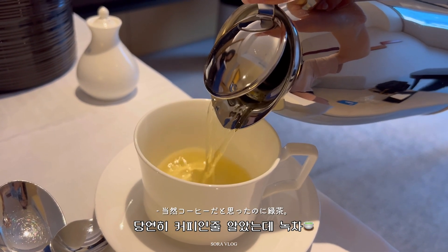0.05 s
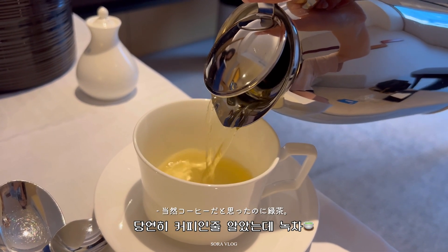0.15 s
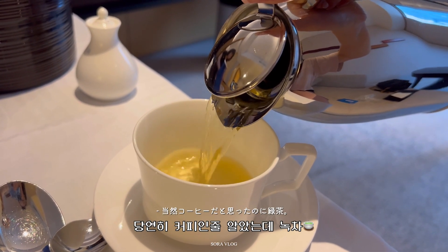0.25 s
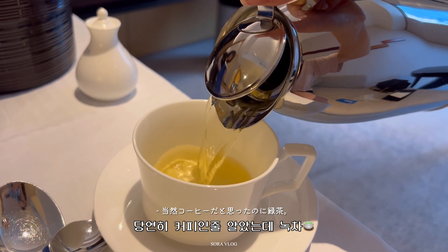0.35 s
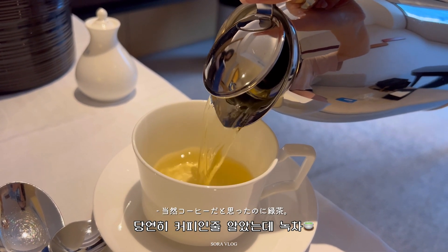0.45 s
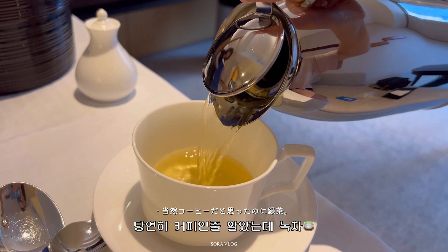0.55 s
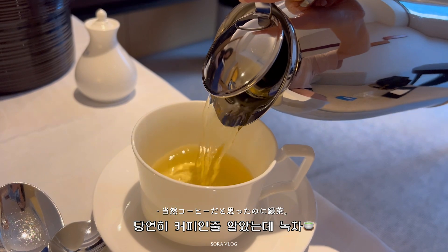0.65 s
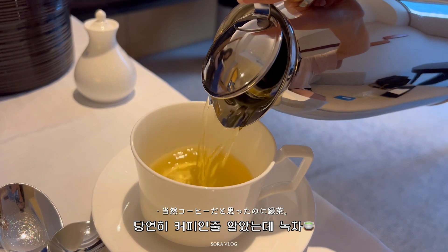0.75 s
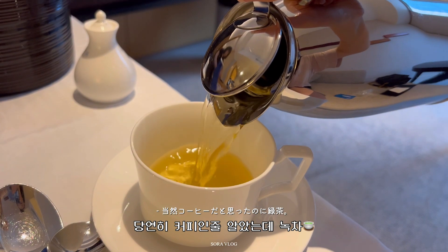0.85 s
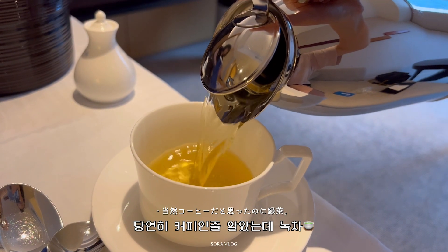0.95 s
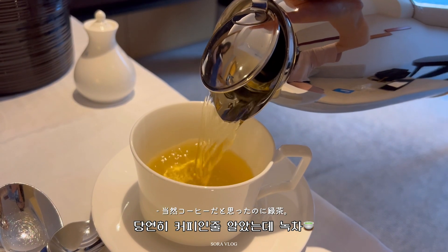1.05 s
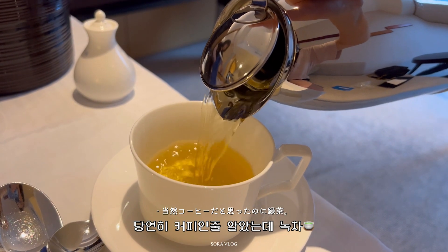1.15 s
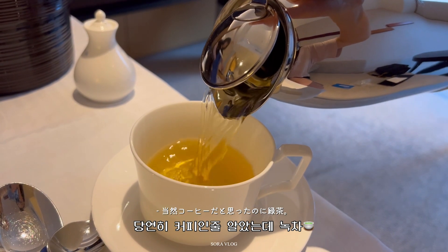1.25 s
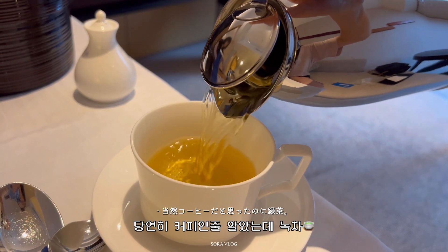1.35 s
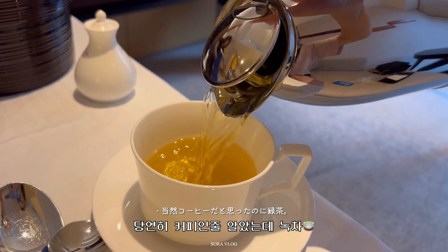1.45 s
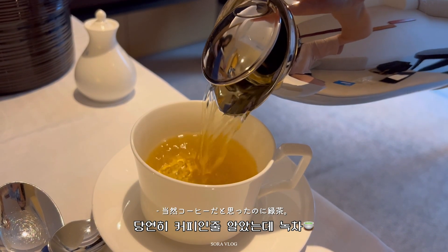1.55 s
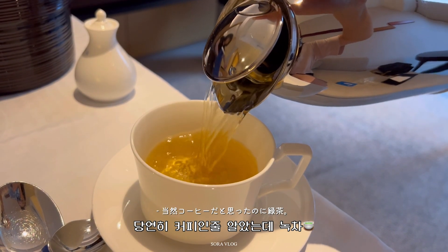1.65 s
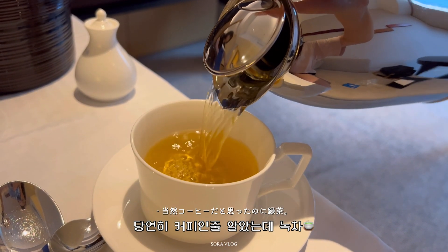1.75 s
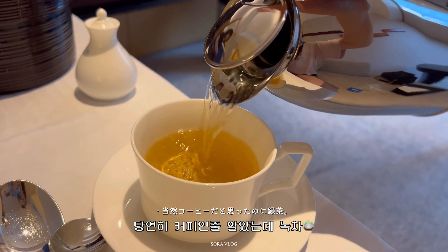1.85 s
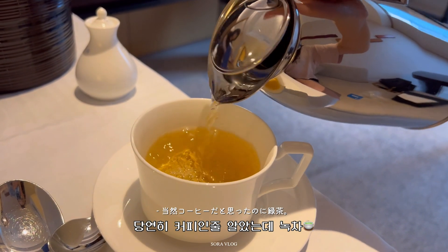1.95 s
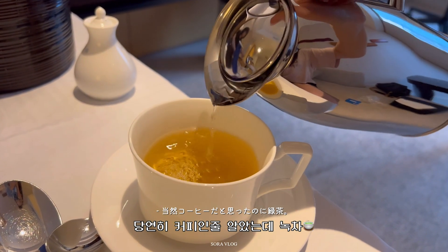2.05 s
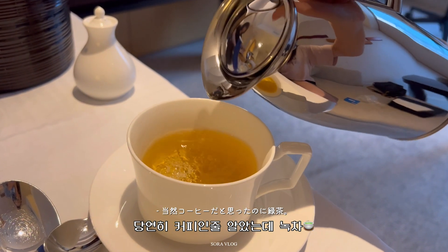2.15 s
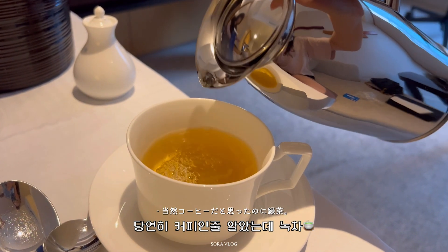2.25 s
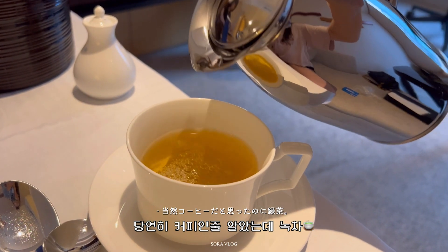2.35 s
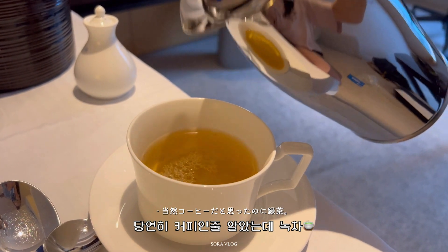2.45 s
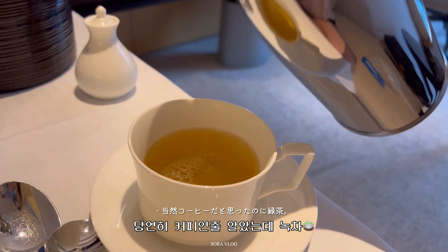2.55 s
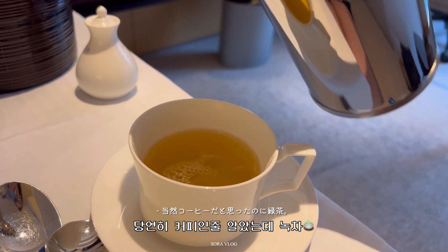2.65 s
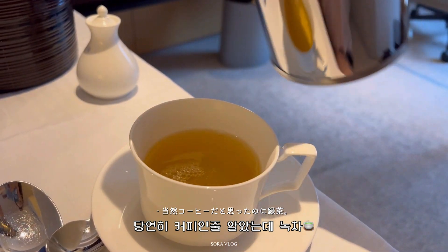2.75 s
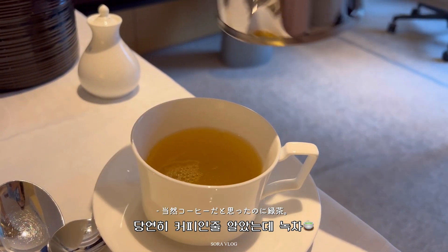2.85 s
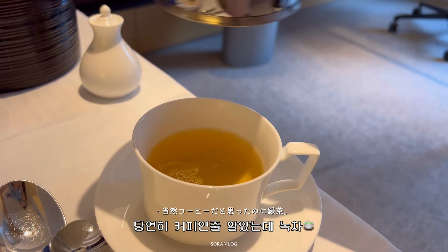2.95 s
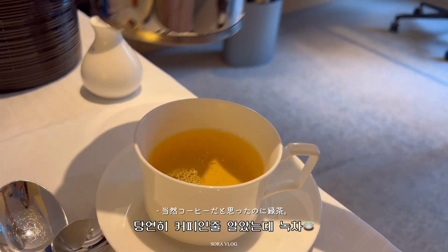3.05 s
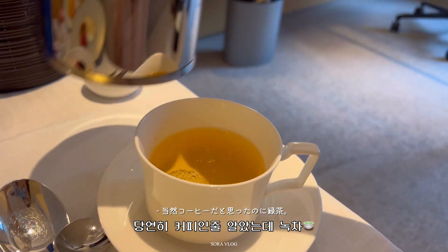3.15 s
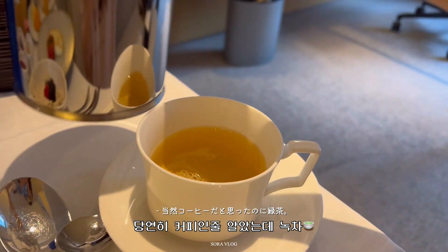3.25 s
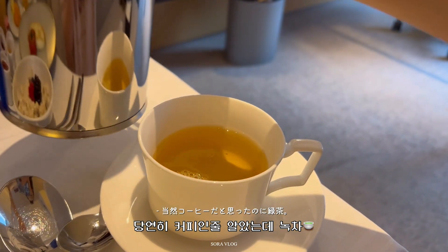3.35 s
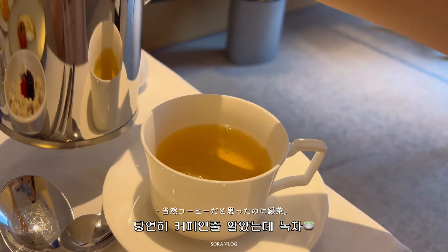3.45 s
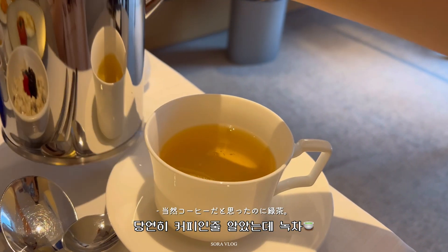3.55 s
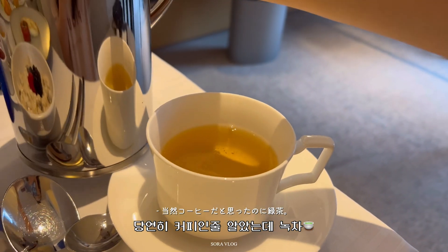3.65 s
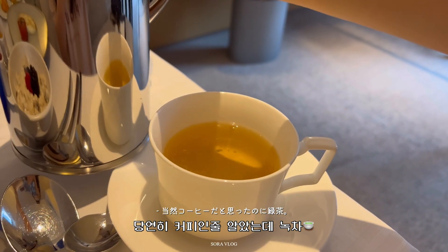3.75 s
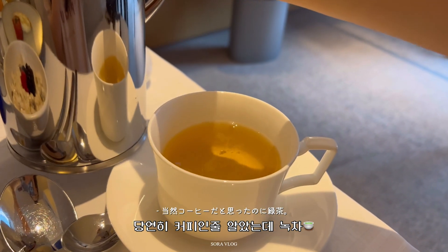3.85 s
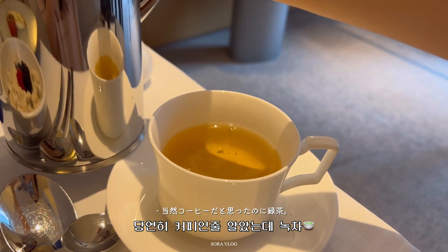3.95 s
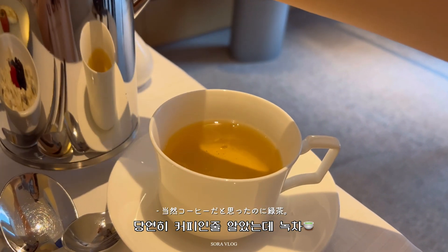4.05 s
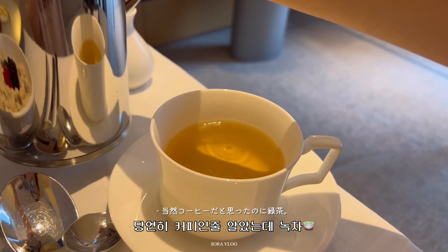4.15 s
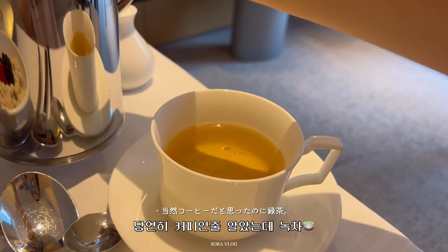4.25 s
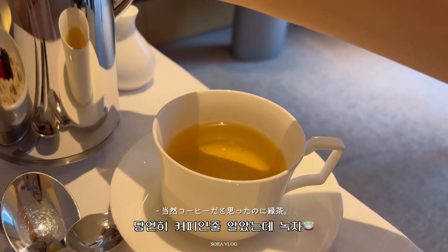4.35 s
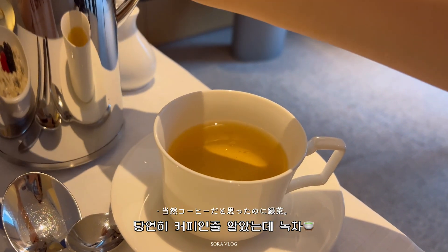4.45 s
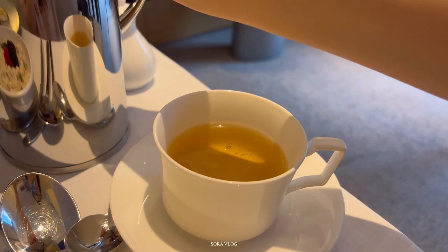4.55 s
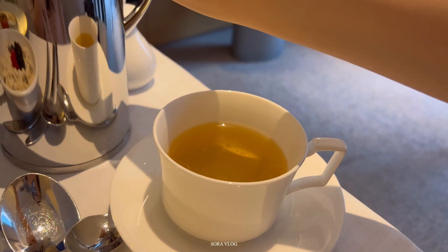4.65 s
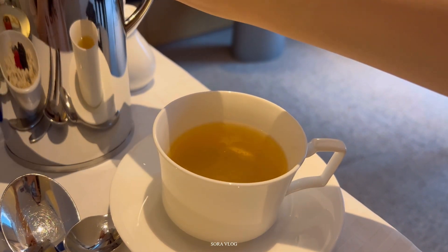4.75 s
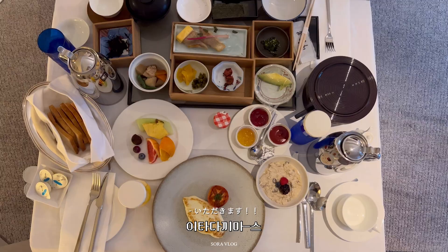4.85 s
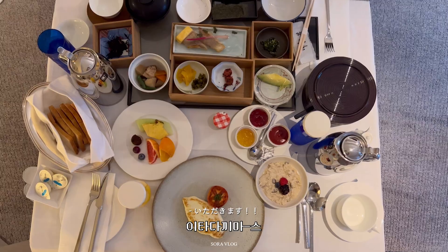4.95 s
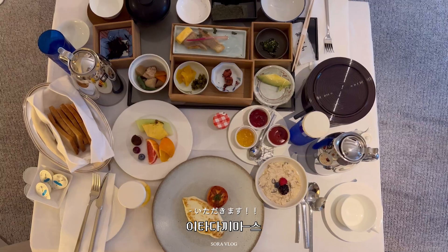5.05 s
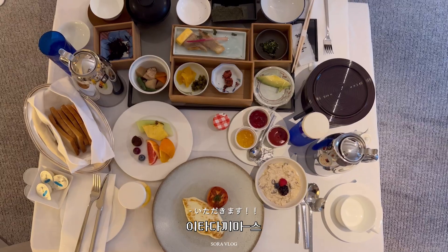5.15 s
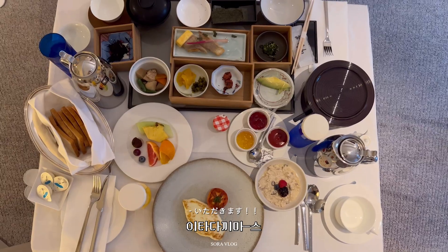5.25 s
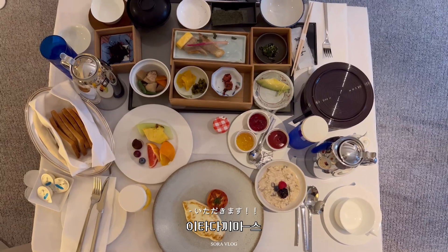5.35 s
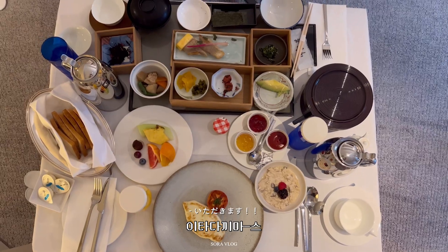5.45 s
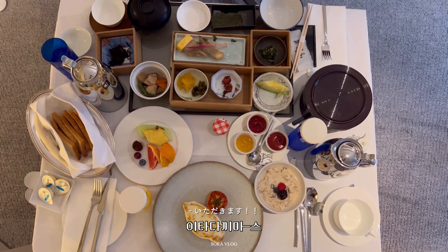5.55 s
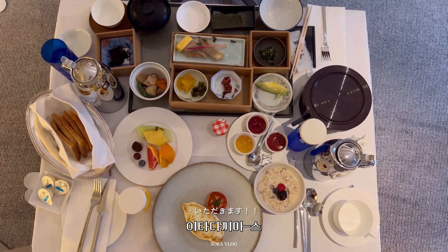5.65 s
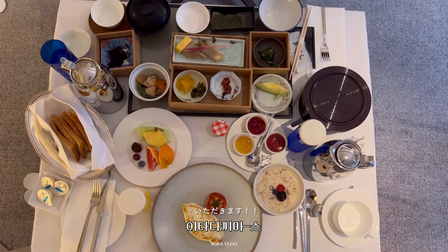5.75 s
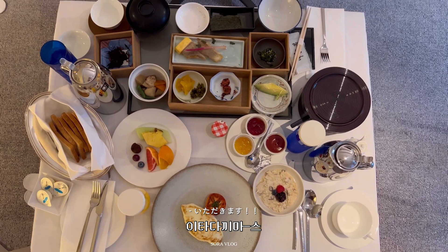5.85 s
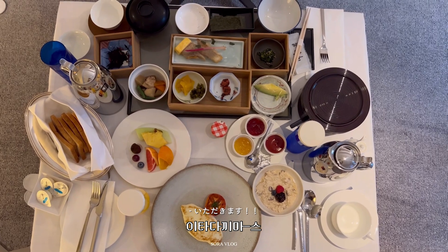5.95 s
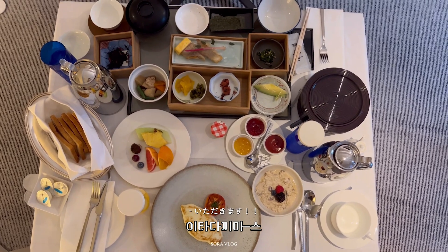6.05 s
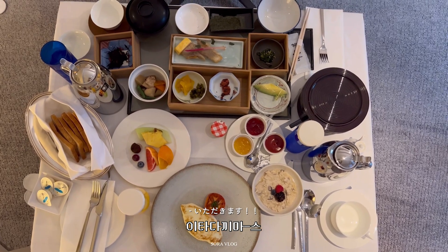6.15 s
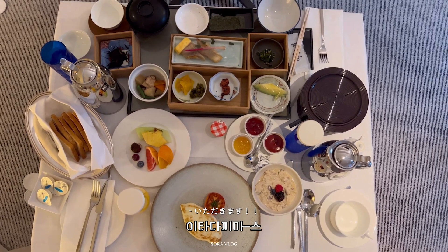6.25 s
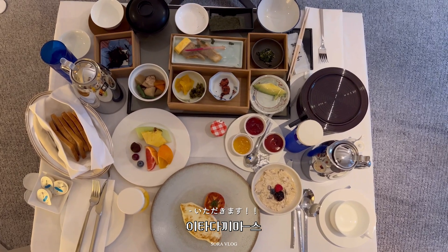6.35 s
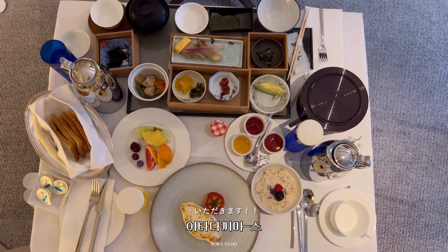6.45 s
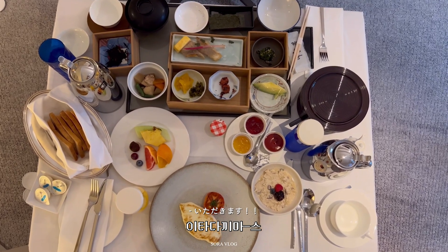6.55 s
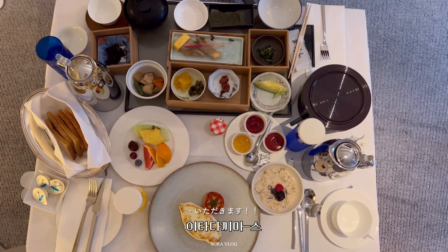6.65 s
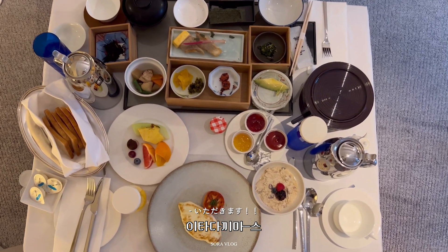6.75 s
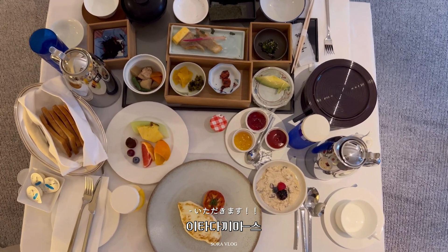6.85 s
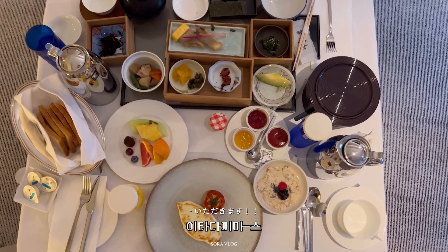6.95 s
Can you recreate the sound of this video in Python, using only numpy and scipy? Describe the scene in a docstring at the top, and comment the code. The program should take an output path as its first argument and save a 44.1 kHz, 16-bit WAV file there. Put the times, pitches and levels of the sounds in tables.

```python
"""Tea trickles from a metal pot into a cup for 2.35 s: splash grains and bubbles, hissing spray, gurgles, glugs, lid tinkles.
Tea sloshes in the lifted pot, the pot clatters (modal rings under impact chatter) and lands on a clothed table; dishes jump.
At 4.864 s a brief silence cuts to a quieter spot: hum and air, a faint tick and a narrow hiss, without the tea and dishes.
Throughout: room tone and filtered-grain cloth rustles; a short noise tail is the carpeted room's answer to tea and dishes."""
import sys
import numpy as np
from scipy import signal
from scipy.fft import rfft, irfft
from scipy.io import wavfile
from scipy.ndimage import uniform_filter1d

SR = 44100
rng = np.random.default_rng(int(sys.argv[2]) if len(sys.argv) > 2 else 0)


def to_wav(s):
    """Save 16-bit WAV."""
    ch = np.atleast_2d(s).T  # columns
    pcm = np.round(np.clip(ch, -1, 1) * 32767)  # PCM
    wavfile.write(sys.argv[1], SR, pcm.astype(np.int16))


N = 308250
T = np.arange(N) / SR
CUT_S = 4.864


def undb(db):
    """Decibels to amplitude ratio."""
    return 10 ** (np.asarray(db) / 20)


def level(x, db=0):
    """Scale to an RMS level."""
    return x * undb(db) / np.sqrt(np.mean(x ** 2))


def curve(table, index):
    """One column of a table, interpolated over time."""
    rows = np.array(table, float)
    return np.interp(T, rows[:, 0], rows[:, index])


def colour(x, points):
    """Shape by (Hz, dB) points on a log frequency axis."""
    p = np.array(points, float)
    f = np.fft.rfftfreq(x.shape[-1], 1 / SR) + 1
    gain_db = np.interp(np.log(f), np.log(p[:, 0]), p[:, 1])
    return irfft(rfft(x) * undb(gain_db), x.shape[-1])


def band(x, hz, width_hz):
    """Second-order resonance with unit peak gain."""
    return signal.lfilter(*signal.iirpeak(hz, hz / width_hz, SR), x)


def dull(x, hz, order=2):
    """Butterworth low-pass."""
    return signal.lfilter(*signal.butter(order, np.clip(hz, 50, 18000), fs=SR), x)


def fade(t60, length_s):
    """Exponential decay, -60 dB at t60 [s]."""
    return np.exp(-np.log(1000) * np.arange(int(length_s * SR)) / SR / max(t60, 1e-3))


def swell(s, hold_s, rise_db_per_s, fall_db_per_s):
    """Gain that rises to full at s, holds and falls."""
    before_s = np.clip(s - T, 0, None)
    after_s = np.clip(T - s - hold_s, 0, None)
    return undb(-rise_db_per_s * before_s - fall_db_per_s * after_s)


def walk(rate_hz):
    """Random levels held 1 / rate_hz s, then slewed."""
    k = int(SR / rate_hz)
    steps = np.repeat(rng.standard_normal(N // k + 1), k)
    return 1.2 * uniform_filter1d(steps, k)[:N]


def grains(rate_hz, spread_db):
    """Randomly timed clicks of very uneven size."""
    hits = rng.random(N) < rate_hz / SR
    return hits * rng.standard_normal(N) * undb(spread_db * rng.exponential(size=N))


def tone(hz, t60, glide=0):
    """A fading sine whose pitch may climb."""
    t = np.arange(int(.2 * SR)) / SR
    return np.sin(2 * np.pi * hz * (t + glide * t ** 2)) * fade(t60, .2)


def ring(modes, scatter_db):
    """Modal impulse response: each blow reweights the modes; each mode is a slightly detuned, rough pair."""
    t = np.arange(SR // 2) / SR
    chance = rng.standard_normal((len(modes), 2))
    out = 0
    for (hz, db, t60), (weight, detune) in zip(modes, chance):
        pair = np.sin(2 * np.pi * hz * t) + 0.75 * np.sin(2 * np.pi * hz * (1 + 0.0087 * detune) * t)
        out = out + undb(db + scatter_db * weight) * fade(t60, .5) * pair
    return out


def add(out, s, sound, db):
    """Place a sound at s with the given peak in out."""
    i = int(s * SR)
    out[i:i + len(sound)] += (sound * undb(db) / np.abs(sound).max())[:N - i]


def room_tone():
    """A wavering low hum, alike on both sides, over ventilation noise that grows unrelated towards the treble."""
    # air spectrum before scaling: (frequency [Hz], relative density [dB per Hz])
    air_spectrum = [(38, -31.5), (65, 0), (207, -9), (243, -14.5), (273, -8.5), (396, -13), (511, -13),
                    (629, -24), (740, -22.5), (891, -26.5), (1380, -31.5), (2200, -42.5), (9030, -45),
                    (13400, -32), (16500, -54.5)]
    hum_hz, waver_hz, hum_db, air_db = 45.4, 4, -59.5, -63.5
    # after the cut the hum starts lower and swells; the air dips, then settles a little lower
    hum_dip_db, hum_swell_db_per_s = -11, 4.5
    air_dip_db, air_after_db, air_return_s = -4, -2, 0.73
    since_s, after = np.clip(T - CUT_S, 0, None), T > CUT_S

    flicker = undb(2.0 * walk(20) - 3.0)  # the faint top hiss comes and goes
    hum_phase = 2 * np.pi * np.cumsum(hum_hz + waver_hz * walk(8.8)) / SR
    hum_level_db = hum_db + after * (hum_dip_db + hum_swell_db_per_s * since_s) + 2.0 * walk(5)
    hum = np.sqrt(2) * np.sin(hum_phase) * undb(hum_level_db)

    mid, side = colour(rng.standard_normal((2, N)), air_spectrum)
    mid, side = (dull(v, 7000) + (v - dull(v, 7000)) * flicker for v in (mid, side))
    side = side - 0.63 * dull(side, 200, order=1)
    air = np.array([mid + side, mid - side]) * undb(air_db) / np.std(mid)
    air_change_db = after * (air_after_db + air_dip_db * np.exp(-since_s / air_return_s))
    return hum + air * undb(air_change_db + .8 * walk(5))


def ticking():
    """After the cut a very faint high tick repeats evenly beside a narrow hiss."""
    start_s, period_s, tick_hz, tick_db = 4.939, .11794, 12300, -59
    hiss_hz, hiss_db = 8330, -86
    out, times = np.zeros(N), np.arange(start_s, T[-1], period_s)
    for s, noise in zip(times, rng.standard_normal((len(times), 400))):
        add(out, s, band(noise * fade(0.01, 400 / SR), tick_hz, 1600), tick_db)
    hiss = np.array([level(band(v, hiss_hz, 700), hiss_db) for v in rng.standard_normal((2, N))])
    return out + hiss * (T > CUT_S)


def rustle():
    """Fine fibre grains under moving sleeves: each movement has its own body colour and a crisp top."""
    # movements: (full level at [s], body [dB], body centre [Hz], crisp top minus body [dB], hold [s])
    moves = [(2.998, -72.5, 5040, -3, 0.0079), (3.086, -68, 2450, -6, 0.004),
             (3.45, -64.5, 2930, -3, 0.078), (4.14, -46, 1507, -13, .01), (4.27, -58.5, 2515, -5.5, 0.0077),
             (4.447, -62, 4500, -18, 0.017), (5.119, -61, 2400, -4, 0.051), (5.36, -72, 5484, -1.5, .06),
             (5.527, -83, 5010, -3, .01), (5.633, -74, 6000, 0.5, .01), (5.739, -67, 2970, -4, 0.019),
             (6.165, -76, 3500, -7, .08), (6.365, -72.5, 6000, -3, 0.066),
             (6.525, -69.5, 2204, -3.5, 0.015), (6.812, -72, 2500, -2, 0.015)]
    # cloth spectrum: (frequency [Hz], relative density [dB per Hz])
    cloth = [(350, -4), (600, 4.5), (1400, -6), (3000, -8), (5440, -5), (8600, -13.5), (10600, -10.5),
             (14600, -24.5), (16500, -44.5)]
    bed_db, rise_db_per_s, fall_db_per_s = -85, 500, 129.5
    width_ratio = 1.3  # bandwidth of each of two cascaded resonances / centre

    fibres = np.array([colour(level(grains(5000, 1.6)) + 0.61 * rng.standard_normal(N), cloth)
                       for _ in range(2)])
    fibres = fibres + 0.22 * fibres[::-1]  # crosstalk between sides
    body = level(dull(fibres, 7500, order=4))
    crisp = level(fibres - dull(fibres, 9800))
    out = undb(bed_db + 1.5 * walk(7.6)) * level(band(body, 3500, 5000))  # faint stir between moves
    for s, db, hz, crisp_db, hold_s in moves:
        moving = undb(db) * swell(s, hold_s, rise_db_per_s, fall_db_per_s)
        tinted = band(band(body, hz, width_ratio * hz), hz, width_ratio * hz)
        out = out + moving * (level(tinted) + undb(crisp_db) * crisp)
    return out


def thuds():
    """The pot lands: a soft push through the cloth rings the table top."""
    # landings: (time [s], peak before high-pass [dB], contact scale [s])
    landings = [(3.638, -24.5, 0.0018), (3.903, -30, 0.0014), (4.541, -11.5, 0.0018), (4.728, -19, 0.0024)]
    # table-top modes: (frequency [Hz], level [dB], t60 [s])
    table_modes = [(84, -23, 0.12), (122.3, -22, 0.22), (168.8, -15, .08), (270.2, -5, 0.016),
                   (350.2, 0, 0.13), (363.5, -1, .06), (500, -12, 0.035)]
    out = np.zeros(N)
    for s, db, contact_s in landings:
        push = np.exp(-.5 * ((np.arange(400) / SR - 1.8 * contact_s) / (0.27 * contact_s)) ** 2)
        add(out, s, signal.fftconvolve(push, ring(table_modes, scatter_db=1.5)), db)
    return signal.lfilter(*signal.butter(2, 85, "high", fs=SR), out)  # the landing stays light below 85 Hz


def slosh():
    """Tea washing inside the lifted pot: grains ring the metal belly under one swell."""
    # belly resonances: (frequency [Hz], width [Hz], level [dB])
    belly_modes = [(1489, 130, 3.5), (1130, 250, -6.5), (3600, 750, -10.5), (4500, 140, -10.5),
                   (6070, 200, -33.5)]
    wash = level(grains(1200, 1.8))
    belly = level(sum(undb(db) * band(wash, hz, w) for hz, w, db in belly_modes), -69)
    return belly * swell(2.644, hold_s=.2, rise_db_per_s=140, fall_db_per_s=43.5)


def glugs():
    """Air glugging back into the spout: short fading low sines."""
    # glugs: (time [s], peak [dB])
    events = [(1.36, -47), (1.976, -44.5), (2.022, -38.5), (2.11, -39), (2.142, -43)]
    out = np.zeros(N)
    for s, db in events:
        add(out, s, tone(450, t60=.07), db)
    return out


def lid():
    """The lid tinkles on its hinge: light blows ring its metal modes."""
    # tinkles: (time [s], peak [dB])
    tinkles = [(0.1094, -46), (0.1247, -41), (0.2283, -48), (0.369, -54.5), (0.474, -57), (0.713, -43),
               (0.7257, -42), (0.979, -60), (1.9794, -48), (2.019, -37)]
    # lid modes: (frequency [Hz], level [dB], t60 [s])
    lid_modes = [(6050, 11, 0.071), (5900, -23, .07), (6380, -11, 0.033), (3620, -17, 0.15)]
    out = np.zeros(N)
    for s, db in tinkles:
        add(out, s, ring(lid_modes, scatter_db=4), db)
    return out


def knocks():
    """Damped blows of uneven grain on dishes and table: hollow body, low boom, crack on top."""
    # knocks: (time [s], body peak [dB], body centre [Hz], body t60 [s])
    blows = [(0.152, -29.5, 1210, 0.025), (.764, -32.5, 1120, 0.027), (0.78, -38.5, 1250, 0.024),
             (1.819, -43, 980, 0.017), (1.838, -21, 1070, 0.02), (2.639, -43, 1870, 0.01),
             (3.082, -48.5, 1380, 0.054), (4.130, -32.5, 1200, 0.099), (4.142, -26.5, 1160, 0.094),
             (4.21, -46, 1318, 0.12), (4.27, -50.5, 1500, 0.091)]
    # the longer a knock drags, the less it booms
    boom_db, boom_loss_db_per_s = 6.5, 228
    # dragging and high knocks crack more; offset at 1 kHz
    crack_db, crack_gain_db_per_s, crack_db_per_octave = -27.5, 219.5, 22.5
    out, rise = np.zeros(N), 1 - fade(0.023, .2)
    for (s, db, hz, t60), noise in zip(blows, rng.standard_normal((len(blows), SR // 5))):
        grit = noise * np.abs(noise) * rise
        body = dull(band(grit * fade(t60, .2), hz, 1.5 * hz), 2.6 * hz)
        boom = band(grit * fade(1.26 * t60, .2), 315, 425)
        crack = dull(grit * fade(0.45 * t60, .2), 5000)
        crack_offset_db = crack_db + crack_gain_db_per_s * t60 + crack_db_per_octave * np.log2(hz / 1000)
        add(out, s, body, db)
        add(out, s, boom, db + boom_db - boom_loss_db_per_s * t60)
        add(out, s, crack, db + crack_offset_db)
    return out


def clinks(events, modes, rattle_t60_s, bare_hz, bare_db, harder=0):
    """A first contact and smaller chatter ring the object; the contacts are also heard bare (harder scales by blow)."""
    out = np.zeros(N)
    for s, db, sustain in events:
        chatter = rng.standard_normal(SR // 10) ** 3 * fade(rattle_t60_s, .1)
        chatter[0] = 10.0
        body = ring([(hz, g, t60 * sustain) for hz, g, t60 in modes], scatter_db=1.5)
        add(out, s, signal.fftconvolve(chatter, body)[:SR // 2], db)
        add(out, s, band(chatter, bare_hz, 1.2 * bare_hz), (1 + harder) * db + bare_db)
    return out


def metal_clatter():
    """Pot against cutlery and porcelain, and a nudged glass; a hand stills the ringing."""
    # pot contacts: (time [s], peak [dB], ring length factor)
    pot_blows = [(3.628, -28, .4), (3.637, -5.5, 0.94), (3.650, -9.5, 1), (3.662, -9.5, 0.4),
                 (3.674, -8, 0.59), (3.690, -17.5, 0.26), (3.722, -20.5, 1), (3.900, -14, 0.49),
                 (3.910, -16.5, 0.38)]
    # pot modes: (frequency [Hz], level [dB], t60 before length factor [s])
    pot_modes = [(1055, -21, 0.3), (1567, -11, 0.15), (1660, -7, 0.086), (1650, -9.5, 0.07),
                 (1780, -6.5, 0.2), (2348, -10.5, .15), (2665, -10.5, 0.19), (3340, -13.5, 0.074),
                 (3965, 2.5, 0.28), (4130, -3.5, 0.13), (4490, -6.5, 0.15), (4600, -9.5, .12),
                 (4560, -9, 0.32), (4700, -9, 0.2), (5130, -12.5, .12), (5490, -8, 0.15), (6230, -11, 0.35),
                 (6540, -12, 0.21), (6990, -11, 0.25), (7200, -9.5, 0.17), (7600, -11, .15),
                 (8690, -12, 0.2), (9050, -11, 0.12), (9300, -22, 0.18), (11300, -11.5, 0.15),
                 (11660, -14, 0.2), (12190, -12.5, 0.16), (12835, -13.5, 0.16), (13800, -17.5, .08)]
    # nudges of a nearby glass: (time [s], peak [dB], ring length factor)
    nudges = [(3.722, -25.5, 1.1), (3.968, -33.5, 0.86)]
    # glass modes: (frequency [Hz], level [dB], t60 before length factor [s])
    glass_modes = [(2330, -4, 0.76), (3480, -6, .45), (3640, -3, .55), (4300, -9.5, .25)]
    hand_s, hand_t60_s = 4.12, .05
    stilled = undb(-60 * np.clip(T - hand_s, 0, 1) / hand_t60_s)
    metal = clinks(pot_blows, pot_modes, 0.026, 3500, 8.0, harder=0.75)
    glass = clinks(nudges, glass_modes, 0.011, 3500, -21.0)
    return (metal + glass) * stilled


def dish_jumps():
    """Dishes jump after the last two landings and ring in short damped modes."""
    # jumps: (time [s], peak [dB], ring length factor)
    jumps = [(4.546, -21, 0.34), (4.559, -22, 0.75), (4.576, -19, 0.37), (4.741, -24, 0.18),
             (4.752, -26, 0.53)]
    # dish modes: (frequency [Hz], level [dB], t60 before length factor [s])
    dish_modes = [(1040, -13, 0.084), (1141.4, -0.5, 0.068), (1250, -1.5, 0.044), (1603, -4.5, 0.053),
                  (1740, 0.5, 0.027), (1994, -4, 0.047), (2740, -8, .08), (3600, -16, 0.052),
                  (4476, -11.5, 0.13), (4950, -19, 0.1), (6400, -6, 0.079), (8270, -13.5, 0.062),
                  (12170, -8, 0.043), (14600, -13, 0.14)]
    return clinks(jumps, dish_modes, 0.04, 1950, 2.9)


def trickle():
    """Splash grains and small bubbles ring the cup; spray hisses above."""
    # stream: (time [s], splash level [dB], spray level [dB])
    stream = [(0.0, -90, -74.5), (0.31, -85, -72), (0.55, -73, -65), (0.95, -64.5, -68), (1.05, -60, -53.5),
              (1.18, -51.5, -52.5), (1.27, -60.5, -59), (1.47, -48, -51.5), (1.69, -58, -63),
              (1.82, -59, -59.5), (2.04, -63, -66.5), (2.09, -48, -70), (2.26, -66, -73),
              (2.35, -90, -78.5)]
    # air and wall of the cup: (frequency [Hz], width [Hz], level [dB])
    cup_modes = [(1054, 120, 6), (1730, 370, 13), (447, 320, 12.5), (5560, 170, -23)]
    end_s = stream[-1][0]

    drops = level(grains(1500, 2.5)) * undb(2.5 * walk(30))
    resonant = sum(undb(db) * band(drops, hz, w) for hz, w, db in cup_modes)
    splash = level(resonant + undb(1.5) * band(drops, 1200, 2500))

    bubbles = np.zeros(N)
    for when, size, pitch in rng.random((700, 3)):
        add(bubbles, end_s * when, tone(800 * 2.9 ** pitch ** 1.4, 0.016, glide=5.0), 13 * size)
    bubbles /= np.std(bubbles[T < end_s])

    spray = band(level(grains(5000, 1.3)), 3900, 13000) * undb(2.0 * walk(30.4))
    spray = spray + undb(8.5) * band(spray, 6060, 160)  # the lid buzzes faintly
    wet = undb(curve(stream, 1)) * (splash + undb(2.0) * bubbles)
    return (wet + undb(curve(stream, 2)) * level(spray)) * (T < end_s)


def gurgles():
    """Trapped air gurgles: a climbing sine, breathy noise at its pitch, a touch of spray."""
    # gurgles: (time [s], peak of tone and breath [dB], starting pitch [Hz], tone t60 [s])
    events = [(0.464, -56.5, 1780, 0.091), (0.528, -51.5, 1850, .05), (0.565, -52.5, 1750, .14),
              (0.631, -51, 1730, .08), (0.726, -30.5, 1632, 0.11), (0.806, -32, 1344, 0.023),
              (0.888, -35, 890, .04), (0.924, -39.5, 1126, 0.031), (1.052, -33, 1100, 0.043),
              (1.212, -37, 1080, .09), (1.358, -38.5, 1295, 0.076), (1.413, -38, 1120, 0.049),
              (1.462, -32, 1084, 0.09), (1.493, -32.5, 940, 0.035), (1.546, -38, 1750, 0.055),
              (1.572, -39, 1063, 0.028), (1.624, -34.5, 1580, .04), (1.717, -36, 1210, 0.085),
              (1.973, -40, 2100, .04), (2.018, -36, 1114, 0.044), (2.037, -33.5, 1864, .045),
              (2.104, -30, 1677, .06), (2.136, -36.5, 1424, 0.12), (2.747, -45, 1137, 0.047)]
    out = np.zeros(N)
    for (s, db, hz, t60), noise in zip(events, rng.standard_normal((len(events), int(.2 * SR)))):
        breath = band(noise, hz, 600) * fade(1.5 * t60, .2)
        add(out, s, tone(hz, t60, glide=1.5) + 1.5 * breath, db)
        add(out, s, band(noise, 5200, 10500) * fade(0.45 * t60, .2), db - 26)
    return out


def spits():
    """Sharp spits of spray: a brief treble burst and a longer hiss."""
    # spits: (time [s], burst peak [dB], hissing tail minus burst peak [dB])
    events = [(0.1062, -50, -30), (0.1236, -37.5, -33), (0.465, -53.5, 4.5), (0.611, -30.5, -14.5),
              (0.725, -24, -26), (0.78, -34, -27), (1.358, -46.5, 5.5), (1.462, -32.5, -6), (1.492, -39, 4),
              (1.5445, -26, -32), (1.572, -41, 8), (1.622, -32.5, -20.5), (1.714, -28, -1),
              (1.7725, -29.5, -15), (1.9015, -31.5, -18.5), (1.949, -34.5, -25), (1.9994, -26, -32),
              (2.0179, -27.5, -7), (2.0602, -35.5, -25), (2.1036, -38, -15), (2.1319, -32, -1),
              (2.4086, -52, -28), (2.5046, -51, -29.5), (2.7275, -49, -29), (3.0835, -39.5, -26)]
    out = np.zeros(N)
    for (s, db, tail_db), noise in zip(events, rng.standard_normal((len(events), SR // 5))):
        add(out, s, band(noise, 3500, 10500) * fade(0.15, .2), db + tail_db)
        add(out, s, band(noise, 12100, 2700) * fade(0.0043, .2), db)
    return out


def room(x):
    """Dense reflections, alike on both sides in the bass, the treble dying first."""
    t60_low_s, t60_high_s, room_db = 0.34, 0.22, -4.5
    mid, side = rng.standard_normal((2, int(.7 * SR)))
    side = side - dull(side, 500, order=1)
    noise = np.array([mid + side, mid - side])
    low = dull(noise, 2200, order=1)
    tail = low * fade(t60_low_s, .7) + 0.69 * (noise - low) * fade(t60_high_s, .7)
    delayed = np.pad(tail, ((0, 0), (int(.004 * SR), 0)))
    response = delayed / np.sqrt(np.sum(tail ** 2) / 2)
    return undb(room_db) * signal.fftconvolve(x[None], response, axes=1)[:, :N]


def scene():
    """Table and cup with their reflections until the cut; cloth, room tone and ticking run on their own."""
    # the table lies to the left: (frequency [Hz], left minus right [dB])
    left_lean = [(100, 4.5), (600, 0.5), (1100, 4.5), (2200, 2), (4500, 6.5), (7000, 4), (10000, 0)]
    close_db = -8  # the close cup excites the room less
    gap_s = 0.004
    table = slosh() + glugs() + lid() + knocks() + metal_clatter() + dish_jumps() + thuds()
    cup = trickle() + gurgles() + spits()
    left, right = table + cup + room(table + undb(close_db) * cup)
    near = np.array([colour(left, [(hz, db / 2) for hz, db in left_lean]),
                     colour(right, [(hz, -db / 2) for hz, db in left_lean])])
    heard = near * (T < CUT_S) + rustle() + room_tone() + ticking()
    gap_gain = np.clip(np.abs(T - CUT_S - gap_s / 2) / (gap_s / 2) - 1, 0, 1)
    return heard * gap_gain  # brief silence at the cut


def record(dry):
    """Phone stereo: right lags in the bass, wanders in the middle, shares left's top; peaks are rounded."""
    # right phase against left, before wander: (frequency [Hz], phase [rad])
    right_turn = [(0, 0), (430, 0.1), (800, -4), (1400, -6.0)]
    shared_hz, in_phase_hz, turn_hz = 10000, 13300, 5500
    f = np.fft.rfftfreq(N, 1 / SR)
    left, right = rfft(dry)
    nodes_hz = np.arange(1400, SR / 2, 250)
    steps_rad = np.cumsum(1.76 * rng.standard_normal(len(nodes_hz))) * (nodes_hz > nodes_hz[0])
    turn_rad = np.interp(f, *np.transpose(right_turn)) + np.interp(f, nodes_hz, steps_rad, left=0)
    shared = np.clip((f - shared_hz) / 600 + .5, 0, 1)
    own_part = (1 - shared) * right * np.exp(1j * turn_rad)
    shared_part = shared * left * np.exp(2j * np.pi * (f - in_phase_hz) / turn_hz)
    x = irfft(np.array([left, own_part + shared_part]), N)
    x = signal.sosfilt(signal.butter(6, 37, "high", fs=SR, output="sos"), x)
    x = dull(np.tanh(1.1 * x) / 1.1, 14500)
    return signal.sosfilt(signal.ellip(14, .2, 90, 16600, fs=SR, output="sos"), x)  # steep top limit


dry = scene()
out = record(dry)
to_wav(out)
```